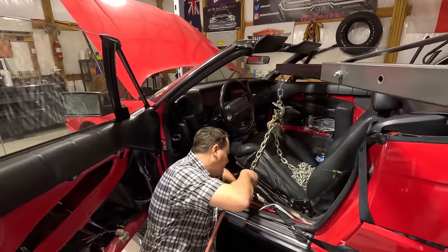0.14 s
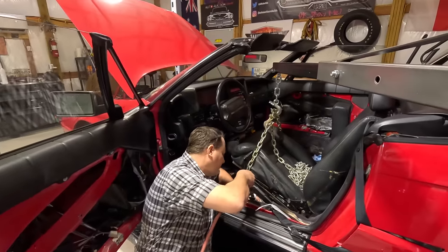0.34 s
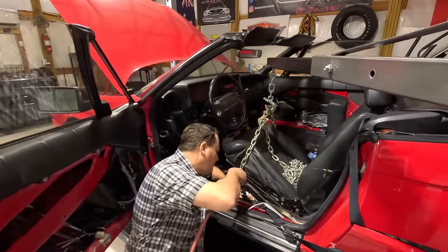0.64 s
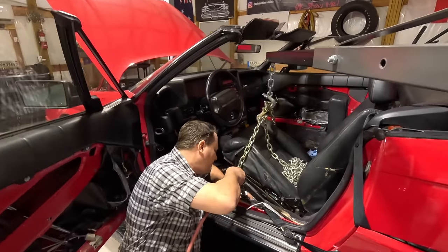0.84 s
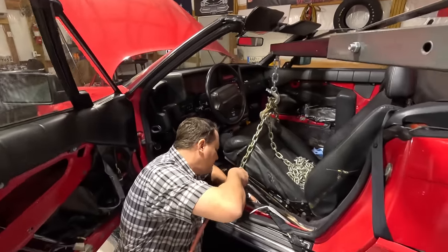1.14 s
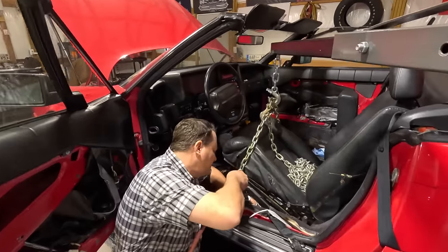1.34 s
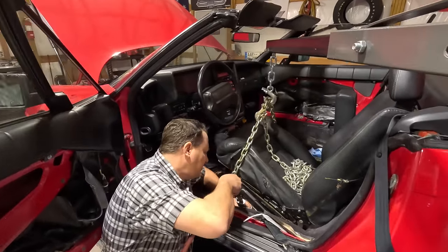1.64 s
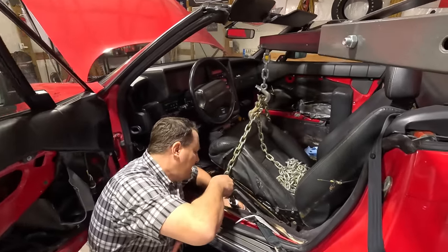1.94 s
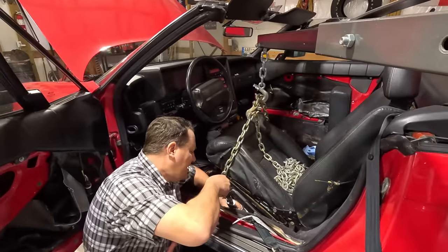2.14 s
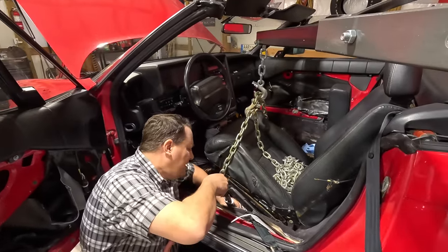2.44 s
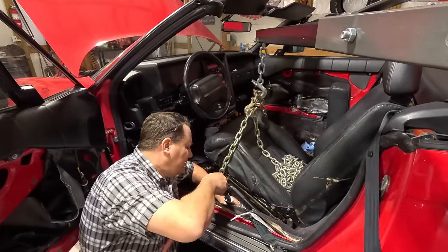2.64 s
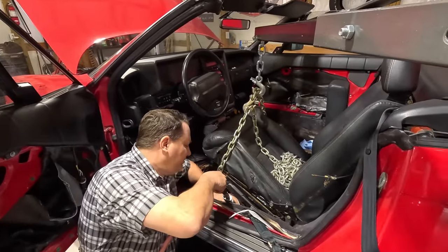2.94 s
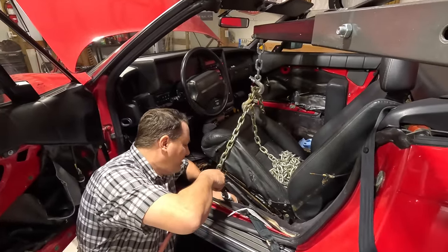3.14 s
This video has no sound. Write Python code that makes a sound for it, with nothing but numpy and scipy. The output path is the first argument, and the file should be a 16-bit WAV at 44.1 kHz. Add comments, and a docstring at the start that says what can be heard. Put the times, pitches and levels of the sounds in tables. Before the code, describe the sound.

Pneumatic hammer rattles in a short slipping burst, then a long hard metallic one over air hiss

```python
"""Inside a car in a garage: a compressed-air hammer fires two bursts at a stuck bolt; in the first the bit mostly slips.
Every stroke swells low modes of tool and cabin and puffs noise through the exhaust ports; strokes that land
ring the steel as dying sines and rattle it as noise. Trigger valve moves thump, knock and spit.
An air fitting leaks (steady noise) over rumble and a faint hum, in two nearly equal channels. The microphone's
gain control ducks under the bursts and slowly recovers."""
import sys
import numpy as np
from scipy import signal
from scipy.fft import rfft, irfft, next_fast_len
from scipy.io import wavfile
from scipy.ndimage import uniform_filter1d

SR = 44100
rng = np.random.default_rng(int(sys.argv[2]) if len(sys.argv) > 2 else 0)


def attenuation_scalar(level_db):
    """Turn a level in dB into a linear amplitude multiplier (20 dB per decade)."""
    decades = np.asarray(level_db, float) / 20
    return 10 ** decades


def to_wav(s):
    """Save 16-bit WAV."""
    ch = np.atleast_2d(s).T  # columns
    pcm = np.round(np.clip(ch, -1, 1) * 32767)  # PCM
    wavfile.write(sys.argv[1], SR, pcm.astype(np.int16))


N = 145530

# Pace of the slipping and the seated burst. Each row: strokes done, time in seconds.
PACE_LOOSE = [(0, .1125), (2, .1427), (3, .1538), (6, .196), (17, .3601), (37, .6651), (44, .7732)]
PACE_SEATED = [(0, .9881), (1, 1.0043), (24, 1.3439), (28, 1.4057), (33, 1.4801), (39, 1.5729),
               (48, 1.7081), (75, 2.1201), (83, 2.239), (93, 2.393), (105, 2.5753), (114, 2.7083),
               (124, 2.8638)]
# Trigger valve moves. Each row: time in seconds, knock in dB, spit in dB, thump in dB.
VALVE = [(0.1061, -24, -28, -1.5), (.807, -18, -9, -18), (.972, -25, -42, -38), (2.899, -15.5, -7, -7)]


def rms_one(x):
    """Scale to rms 1."""
    return x / np.sqrt(np.mean(x ** 2) + 1e-20)


def train(times_s, gain):
    """Clicks of the given heights at the given times."""
    out = np.full(N, 1e-18)  # tiny floor keeps filters out of denormals
    index = (np.asarray(times_s) * SR).astype(int)
    np.add.at(out, np.clip(index, 0, N - 1), gain)
    return out


def fade(t60_s, rise_s=None):
    """Decay factor per sample for a t60, quickened by a rise time constant."""
    quicken = np.exp(-1 / (rise_s * SR)) if rise_s else 1
    return attenuation_scalar(-60 / (t60_s * SR)) * quicken


def ring(clicks, hz, r):
    """Two-pole resonator: a unit click starts a dying sine of height 1."""
    w = 2 * np.pi * hz / SR
    return signal.lfilter([0, r * np.sin(w)], [1, -2 * r * np.cos(w), r * r], clicks)


def swell_ring(clicks, hz, t60_s, rise_s):
    """Dying sine that swells in: a slow ring less a quicker one."""
    return ring(clicks, hz, fade(t60_s)) - ring(clicks, hz, fade(t60_s, rise_s))


def swell(clicks, t60_s, rise_s):
    """Envelope that rises after each click and dies away: slow decay less a quicker one."""
    slow = signal.lfilter([1], [1, -fade(t60_s)], clicks)
    quick = signal.lfilter([1], [1, -fade(t60_s, rise_s)], clicks)
    return slow - quick


def coloured(spectrum):
    """Gaussian noise shaped by (Hz, relative dB per Hz), log-frequency interpolation, rms 1."""
    hz, db = np.transpose(spectrum)
    f = np.arange(N // 2 + 1) * SR / N + 1
    shape = attenuation_scalar(np.interp(np.log(f), np.log(hz), db, -90, -90))
    return rms_one(irfft(rfft(rng.standard_normal(N)) * shape, N))


def strokes():
    """Piston strokes: time in s, strength, kick and landing in dB, and seated flag of each."""
    jitter_s, spread_db = .00025, .6
    landing_loose_db, landing_seated_db = -16, 0.52
    # Air pressure behind the strokes. Each row: time in seconds, strength in dB, kickback into the lowest modes in dB.
    pressure = [(.11, 2.5, 4.5), (.16, -1, 1), (.22, -1.5, 0.5), (.3, -3.1, -0.3), (.5, -2.7, -1),
                (.78, 0.7, 1), (.99, 1.7, 2.5), (1.1, 1.7, 1.7), (1.3, 0.6, 1.3), (2.2, 2.6, 0),
                (2.87, 2.7, -0.2)]
    # Strokes landing unlike the rest of their burst. Each row: time in seconds, landing in dB.
    odd_strokes = [(.1125, -4.5), (.128, -1), (.196, 2), (.257, 2.8), (.271, -14), (.285, 1.5), (.301, -21),
                   (.316, 2.5), (.331, -12), (.345, 2), (.360, -2.5), (.376, -14), (.988, -1.5),
                   (1.048, -11), (1.078, -18), (2.864, -24)]
    bursts = []
    for pace in (PACE_LOOSE, PACE_SEATED):
        count, time_s = np.transpose(pace)
        bursts.append(np.interp(np.arange(count[-1] + 1), count, time_s))
    s = np.concatenate(bursts)
    seated = s > PACE_LOOSE[-1][1]
    landing_db = np.where(seated, landing_seated_db, landing_loose_db)
    for t, db in odd_strokes:
        landing_db[np.argmin(abs(s - t))] = db
    chance = rng.standard_normal((len(s), 2))
    t, pressure_db, kick_db = np.transpose(pressure)
    strength_db = np.interp(s, t, pressure_db) + spread_db * chance[:, 0]
    return s + jitter_s * chance[:, 1], strength_db, np.interp(s, t, kick_db), landing_db, seated


def thump(s, db, kick_db, seated):
    """The push of each stroke swells into tool and cabin modes; the valve's push into the lowest ones."""
    level_db, rise_s, spread_db, kick_below_hz = 14, .0021, .8, 250
    # Tool and cabin modes. Each row: frequency in Hz, sign, level loose in dB, level seated in dB, t60 in seconds.
    modes = [(63, 1, -38, -32, .09), (133, 1, -21.7, -24.7, .076), (204, -1, -18.1, -21.6, .034),
             (358, 1, -28.1, -23.8, .08), (445, 1, -14.9, -17, .018), (643, -1, -31.9, -22.3, .018),
             (727, -1, -22.1, -27, .032), (887, 1, -16.5, -21, .021)]
    out, valve = 0, np.array(VALVE)
    for hz, sign, loose_db, seated_db, t60_s in modes:
        low = hz < kick_below_hz
        mode_db = np.where(seated, seated_db, loose_db) + low * kick_db
        mode_db = mode_db + spread_db * rng.standard_normal(len(s))
        clicks = train(s, attenuation_scalar(db + mode_db))
        clicks = clicks + low * train(valve[:, 0], attenuation_scalar(valve[:, 3] + loose_db))
        out = out + sign * swell_ring(clicks, hz, t60_s, rise_s)
    return attenuation_scalar(level_db) * out


def steel(s, db):
    """A landing strikes the steel's modes, chokes the previous ring to a share, and shakes a rattle loose."""
    rise_s, spread_db = 0.00073, 1.5  # the blow spreads through the steel
    carry, choke_s = .45, .0015  # share of the previous ring left, time constant
    rattle_db, rattle_rise_s, rattle_t60_s = -10, .0015, 0.07
    # Bolt and floor pan. Each row: frequency in Hz, level in dB, t60 in seconds.
    modes = [(1154, -30, 0.18), (1401, -21.5, 0.16), (1518, -21, 0.13), (1878, -17, 0.081),
             (1998, -13.5, 0.056), (2498, -20.5, 0.073), (2718, -19, 0.13), (2915, -17, 0.064),
             (3460, -45, 0.24), (3580, -29, 0.23), (3990, -21.5, 0.061), (4054, -30, .08),
             (4583, -22.5, 0.039), (6320, -16, 0.027), (7180, -13.5, 0.02), (8910, -19, 0.024),
             (12000, -31, .025)]
    # Loose parts after a landing. Each row: frequency in Hz, relative density in dB per Hz.
    rattle = [(530, -4.5), (900, -10.5), (1070, -3.5), (1360, -3), (1950, -4.5), (2250, -7.5), (2830, -8),
              (3260, -10.5), (7230, -10.5), (13000, -18.5), (14500, -12.5), (16000, -18)]
    out = attenuation_scalar(rattle_db) * coloured(rattle) * swell(train(s, attenuation_scalar(db)), rattle_t60_s, rattle_rise_s)
    t = np.arange(N) / SR
    last = np.searchsorted(s, t) - 1
    left = carry + (1 - carry) * np.exp(-abs(t - s[last]) / choke_s)
    for hz, mode_db, t60_s in modes:
        strength = attenuation_scalar(db + mode_db + spread_db * rng.standard_normal(len(s)))
        # latest blow in full, the one before it choked
        for back, share in enumerate((1, left)):
            blow = last - back
            age = np.where(blow >= 0, t - s[blow], 0)
            envelope = attenuation_scalar(-60 * age / t60_s) * (1 - np.exp(-age / rise_s))
            out -= share * strength[blow] * np.sin(2 * np.pi * hz * age) * envelope
    return out


def exhaust(s, db):
    """Band-passed noise puffs, uneven among the ports, over steadier flow; the valve knocks the barrel and spits."""
    puff_level_db, puff_delay_s, puff_rise_s, puff_t60_s = -5, 0.0016, 0.00052, 0.019
    puff_spread_db, port_spread_db = 2, 3
    flow_db, flow_t60_s, flow_rise_s = -28, 0.14, 0.0056
    inrush_ahead_s, inrush_db = 0.0062, -19  # air rushes in ahead of a burst's first stroke
    barrel_hz, barrel_t60_s, barrel_rise_s = 893, 0.053, 0.0016
    # Steady flow between puffs. Each row: frequency in Hz, relative density in dB per Hz.
    flow_spectrum = [(700, -38), (1200, -15), (2100, -11), (2700, -12), (4300, -17.5), (7000, -15.5),
                     (10000, -13.5), (13000, -14), (16000, -36), (16500, -50)]
    # Exhaust ports. Each row: centre in Hz, width in Hz, level in dB.
    ports = [(6500, 2500, -11), (8800, 1300, -2), (9900, 900, -1), (11200, 1200, -2), (13000, 1800, -7),
             (15000, 1500, -6)]
    valve_s, knock_db, spit_db, _ = np.transpose(VALVE)
    stroke_puff_db = db + puff_level_db + puff_spread_db * rng.standard_normal(len(s))
    puff_s = np.r_[s + puff_delay_s, valve_s]
    puff_db = np.r_[stroke_puff_db, spit_db]
    first_s = np.array([PACE_LOOSE[0][1], PACE_SEATED[0][1]])
    inrush = swell(train(first_s - inrush_ahead_s, attenuation_scalar(inrush_db)), 0.075, 0.0034)
    flow = swell(train(s, attenuation_scalar(db + flow_db)), flow_t60_s, flow_rise_s)
    out = coloured(flow_spectrum) * (flow + inrush)
    for hz, width_hz, port_db in ports:
        each_db = puff_db + port_db + port_spread_db * rng.standard_normal(len(puff_s))
        puffs = swell(train(puff_s, attenuation_scalar(each_db)), puff_t60_s, puff_rise_s)
        edges_hz = [hz - width_hz / 2, hz + width_hz / 2]
        band = signal.butter(2, edges_hz, "band", fs=SR, output="sos")
        out += signal.sosfilt(band, rng.standard_normal(N) * puffs)
    return out + swell_ring(train(valve_s, attenuation_scalar(knock_db)), barrel_hz, barrel_t60_s, barrel_rise_s)


def garage(x):
    """Reverb: ten feedback delays of alternating sign, dull return, little bass; computed as a spectrum."""
    t60_s, wall_cut_hz, bass_cut_hz = 0.36, 4500, 420
    size = next_fast_len(N + SR)
    f = np.arange(size // 2 + 1) * SR / size
    combs = 0
    for k, lag_s in enumerate(rng.uniform(.015, .05, 10)):
        loss = attenuation_scalar(-60 * lag_s / t60_s)
        round_trip = np.exp(2j * np.pi * f * lag_s) / loss * (1 + 1j * f / wall_cut_hz)
        combs = combs + (-1) ** k / (round_trip - 1)
    bass_cut = f / (f - 1j * bass_cut_hz)
    return irfft(rfft(x, size) * combs * bass_cut, size)[:N]


def leak():
    """Steady hiss of air escaping at a fitting: coloured noise."""
    # Each row: frequency in Hz, relative density in dB per Hz.
    leak_spectrum = [(120, -62), (200, -16), (851, -24), (968, -19), (1300, -30), (1740, -19.5),
                     (2130, -27), (3070, -25), (3970, -14.5), (5040, -16), (6640, -11), (10700, -8.5),
                     (14900, -9.5), (16000, -9)]
    return attenuation_scalar(-37.5) * coloured(leak_spectrum)


def rumble(s, db):
    """Steady low noise that swells as the strokes shake the microphone."""
    steady_db, mic_shake_db, mic_shake_t60_s, mic_shake_rise_s = -46.5, -32, 0.14, 0.0045
    # Each row: frequency in Hz, relative density in dB per Hz.
    rumble_spectrum = [(12, -50), (20, -16), (92, -1), (155, -15), (205, -17.5), (250, -19.5), (320, -60),
                       (550, -120)]
    mic_shake = swell(train(s, attenuation_scalar(db + mic_shake_db)), mic_shake_t60_s, mic_shake_rise_s)
    return coloured(rumble_spectrum) * (attenuation_scalar(steady_db) + mic_shake)


def hum():
    """Faint steady sine."""
    hz, level_db = 615, -60
    return attenuation_scalar(level_db) * np.sin(2 * np.pi * hz * np.arange(N) / SR)


def scene():
    """Hammer and its room over leak, rumble and hum; two nearly equal channels, a faint difference of opposite sign."""
    land_delay_s, garage_db, channel_gap_db = .0022, -22.5, -45
    s, db, kick_db, landing_db, seated = strokes()
    hammer = thump(s, db, kick_db, seated)
    hammer = hammer + steel(s + land_delay_s, db + landing_db)
    hammer = hammer + exhaust(s, db)
    mono = hammer + attenuation_scalar(garage_db) * garage(hammer) + leak() + rumble(s, db) + hum()
    difference = attenuation_scalar(channel_gap_db) * garage(hammer)
    return mono + difference * [[1], [-1]]


def top_cut(x):
    """Nothing passes above the cut-off."""
    return signal.sosfilt(signal.butter(12, 16740, fs=SR, output="sos"), x)


def record(dry):
    """Bass cut; gain control, led by one channel, ducks in a quick and a slow part, holds, recovers; peaks rounded."""
    mic_cut_hz, top = 22, .45
    threshold_db, squeeze = -29, 0.73  # squeeze: dB of ducking per dB over threshold
    quick_share, quick_s, slow_s = .5, .004, 0.31
    hold_s, release_db_per_s, ahead_s = .17, 24, .013
    step_s = 64 / SR
    dry = signal.sosfilt(signal.butter(2, mic_cut_hz, "high", fs=SR, output="sos"), dry)
    power = uniform_filter1d(dry[0] ** 2, size=700)[::64]
    wanted_db = -squeeze * np.maximum(10 * np.log10(power + 1e-12) - threshold_db, 0)
    gain_db = np.zeros(len(wanted_db))
    for share, attack_s in ((quick_share, quick_s), (1 - quick_share, slow_s)):
        now_db = waited_s = 0.
        for i, want_db in enumerate(wanted_db):
            if want_db < now_db:
                waited_s = 0.
                now_db += (want_db - now_db) * step_s / (attack_s + step_s)
            else:
                waited_s += step_s
                release_db = release_db_per_s * step_s * (waited_s > hold_s)
                now_db += min(want_db - now_db, release_db)
            gain_db[i] += share * now_db
    look_s = np.arange(N) / SR + ahead_s
    gain = attenuation_scalar(np.interp(look_s, np.arange(len(wanted_db)) * step_s, gain_db))
    return top_cut(top * np.tanh(dry * gain / top))


dry = scene()
out = record(dry)
to_wav(out)
```